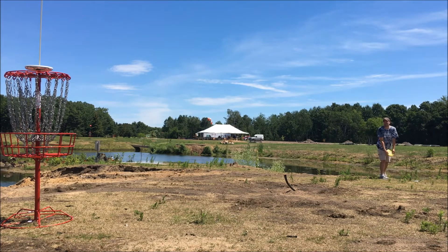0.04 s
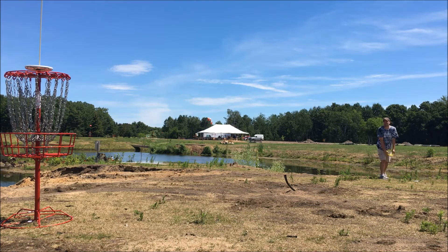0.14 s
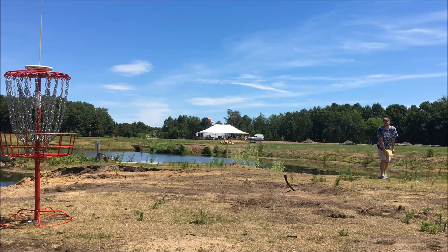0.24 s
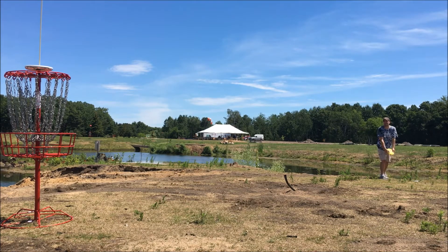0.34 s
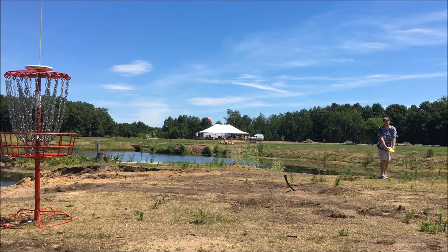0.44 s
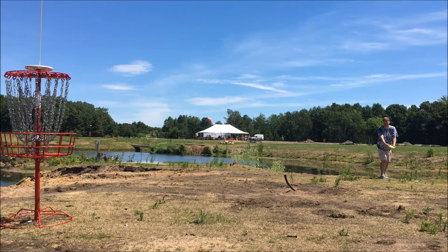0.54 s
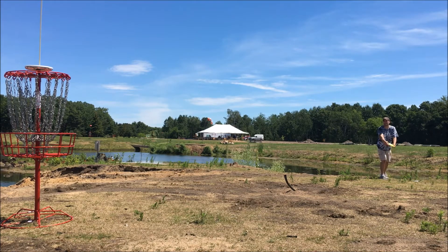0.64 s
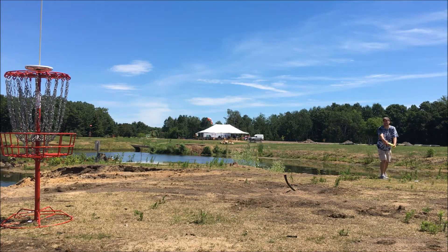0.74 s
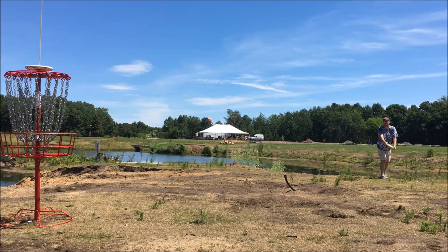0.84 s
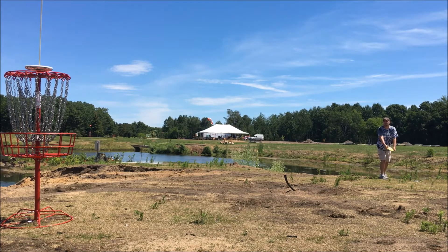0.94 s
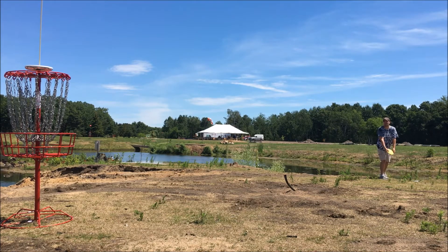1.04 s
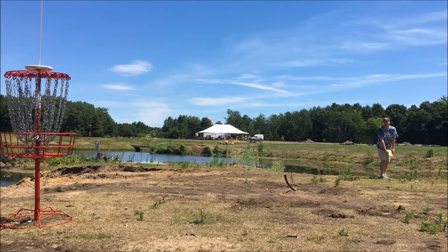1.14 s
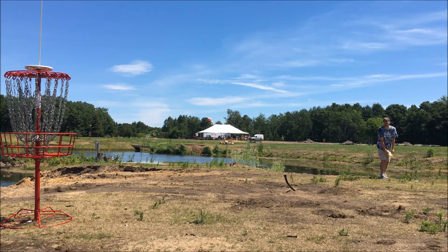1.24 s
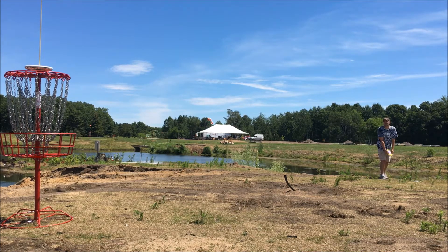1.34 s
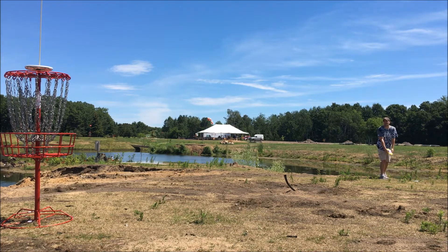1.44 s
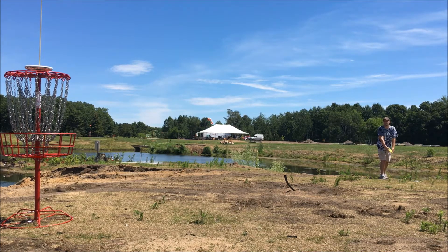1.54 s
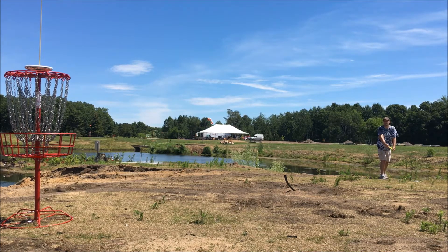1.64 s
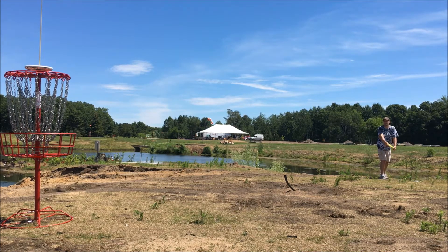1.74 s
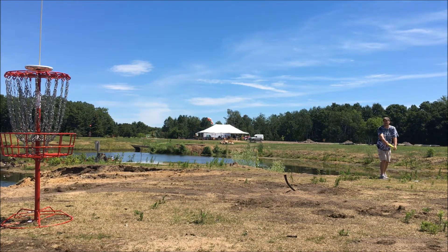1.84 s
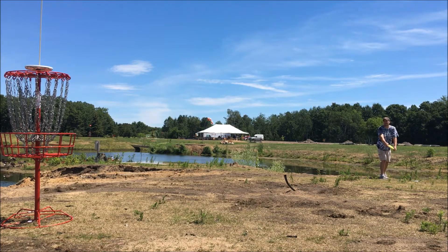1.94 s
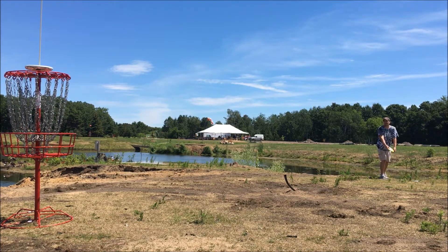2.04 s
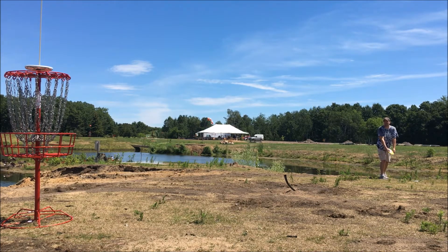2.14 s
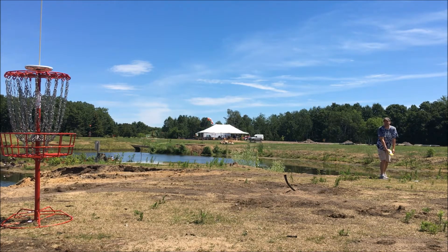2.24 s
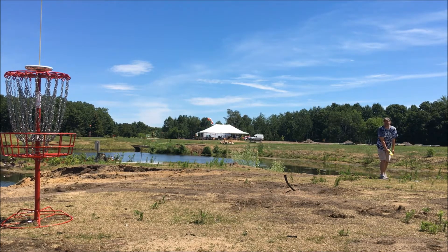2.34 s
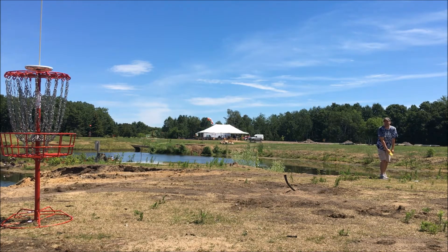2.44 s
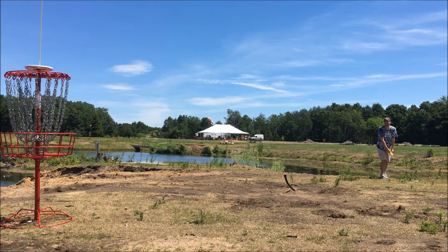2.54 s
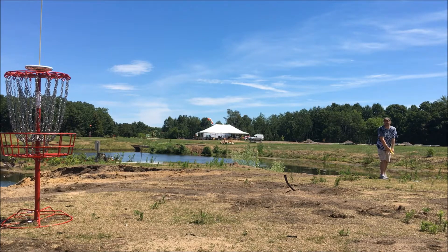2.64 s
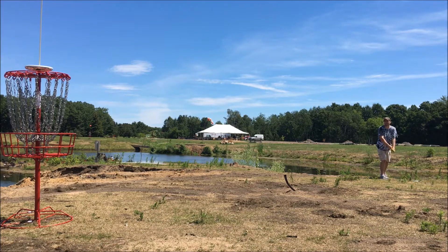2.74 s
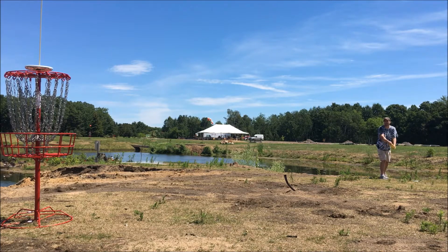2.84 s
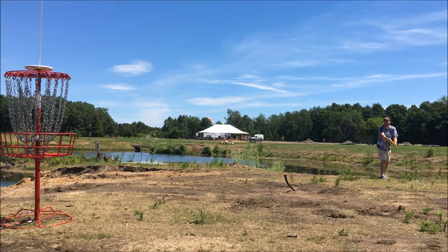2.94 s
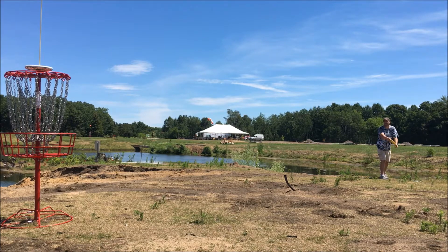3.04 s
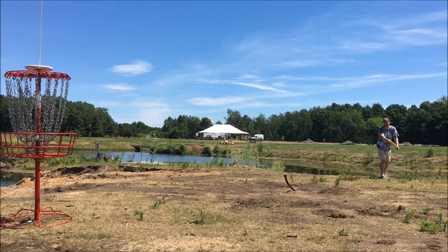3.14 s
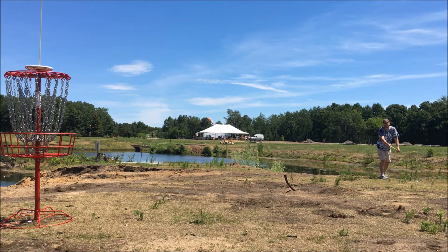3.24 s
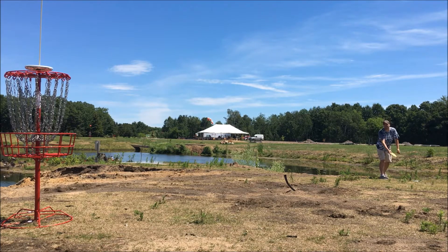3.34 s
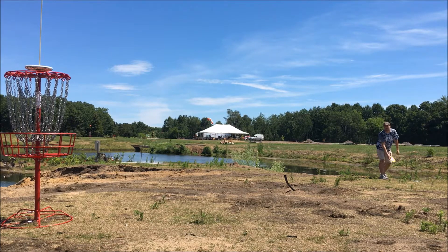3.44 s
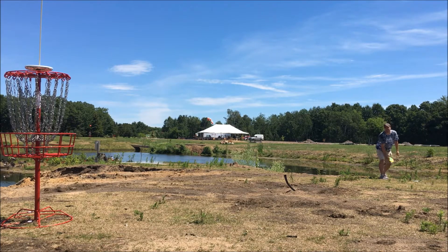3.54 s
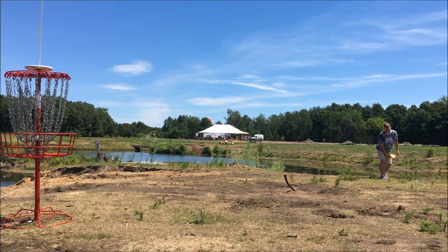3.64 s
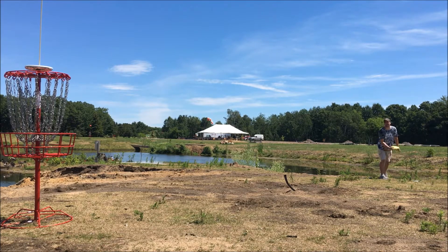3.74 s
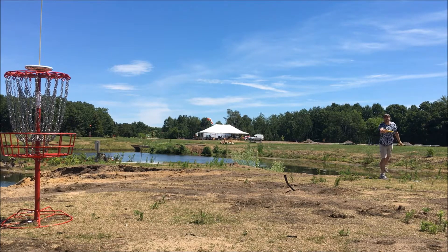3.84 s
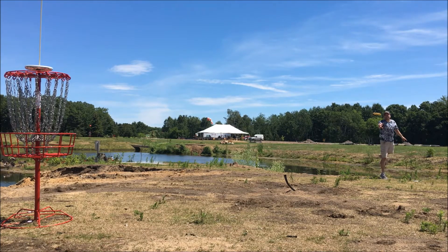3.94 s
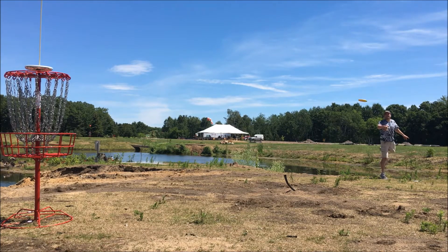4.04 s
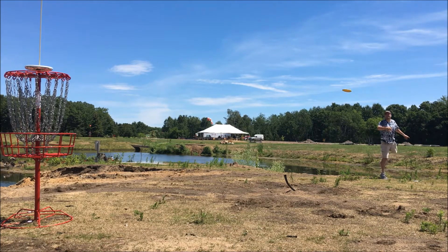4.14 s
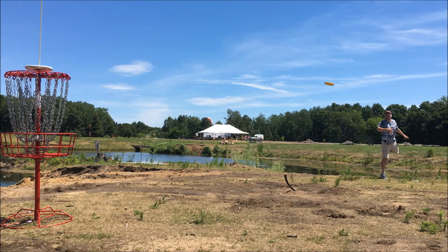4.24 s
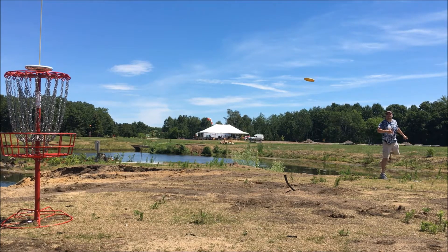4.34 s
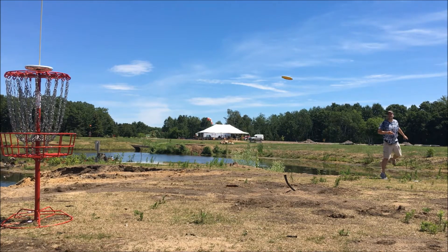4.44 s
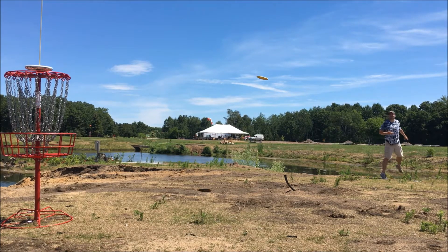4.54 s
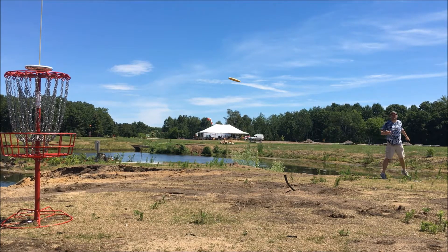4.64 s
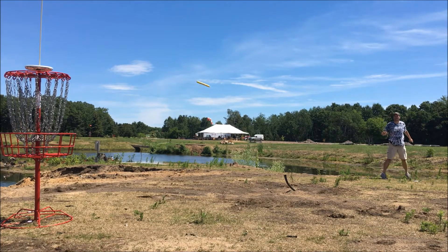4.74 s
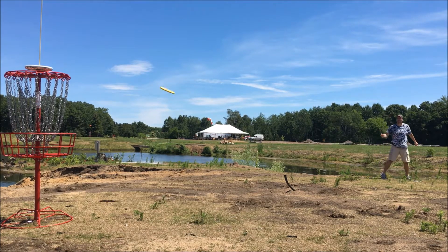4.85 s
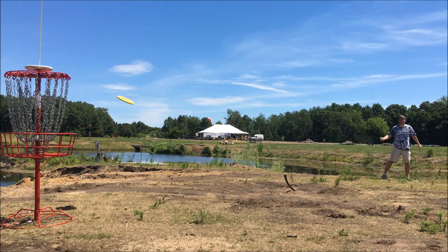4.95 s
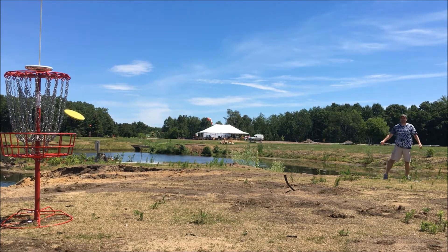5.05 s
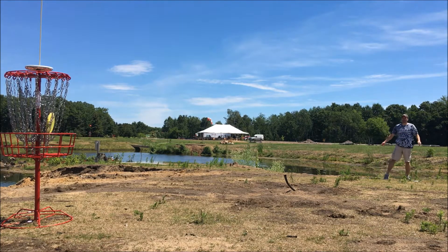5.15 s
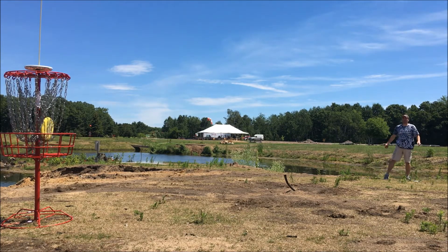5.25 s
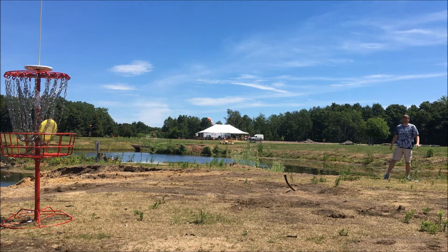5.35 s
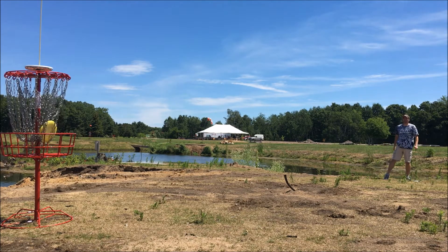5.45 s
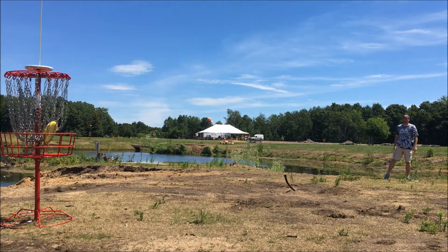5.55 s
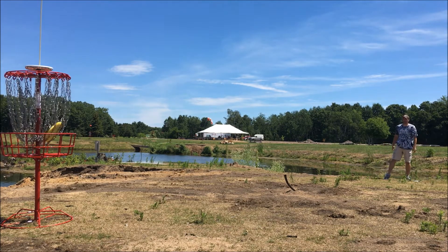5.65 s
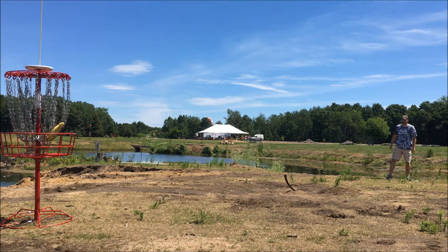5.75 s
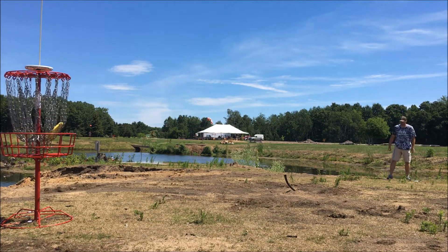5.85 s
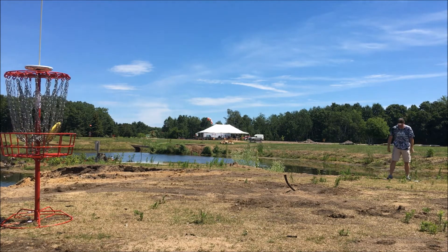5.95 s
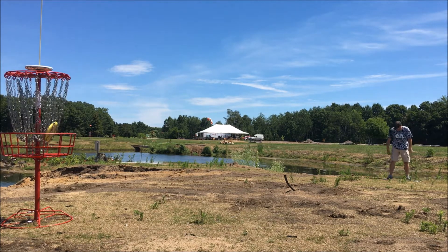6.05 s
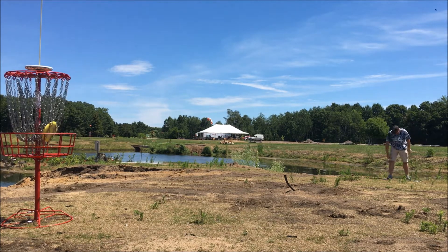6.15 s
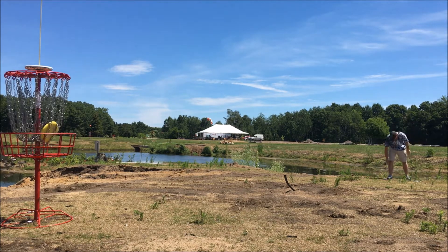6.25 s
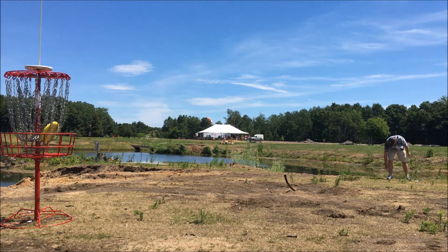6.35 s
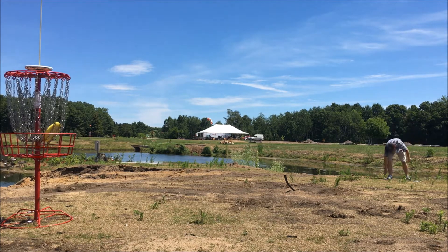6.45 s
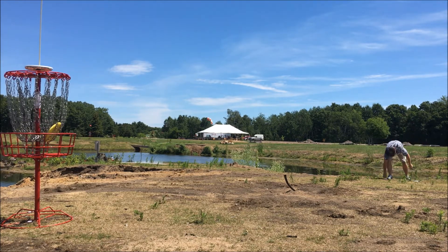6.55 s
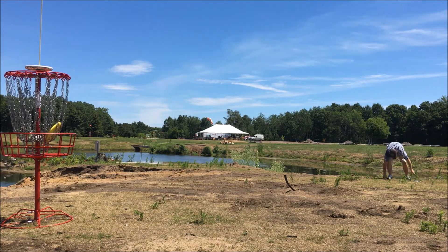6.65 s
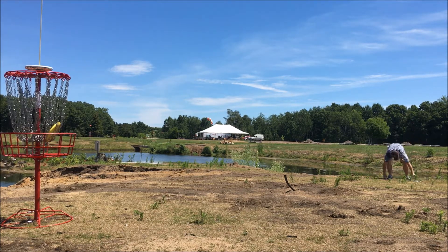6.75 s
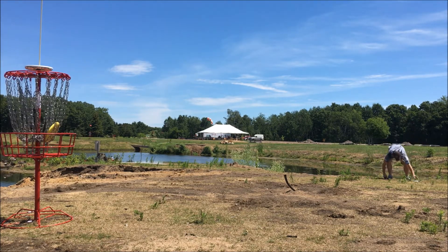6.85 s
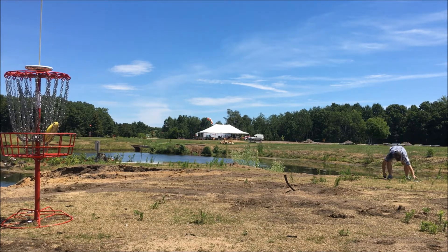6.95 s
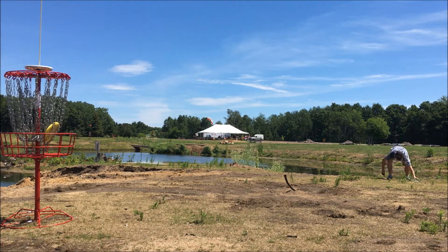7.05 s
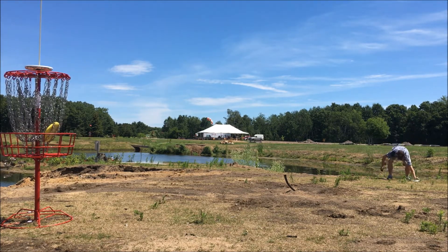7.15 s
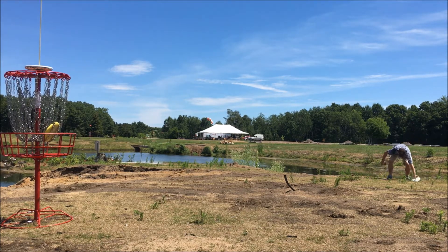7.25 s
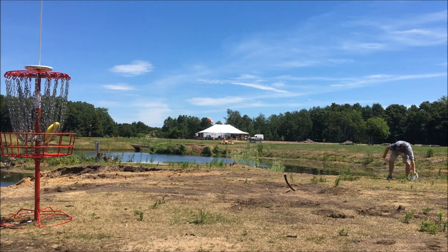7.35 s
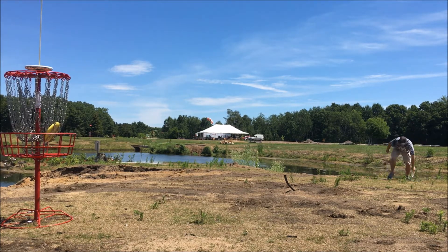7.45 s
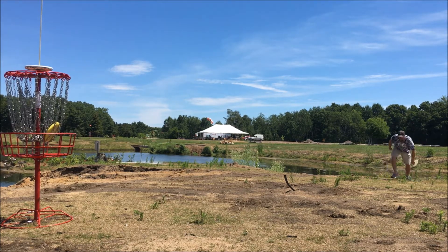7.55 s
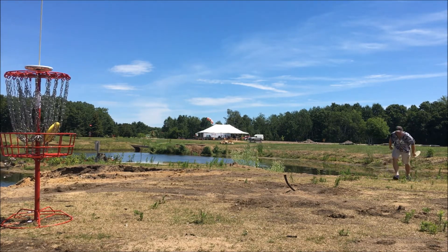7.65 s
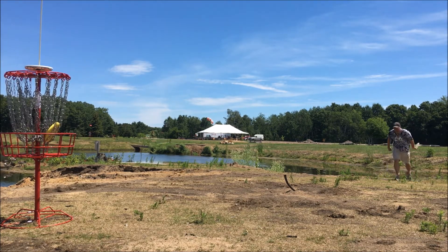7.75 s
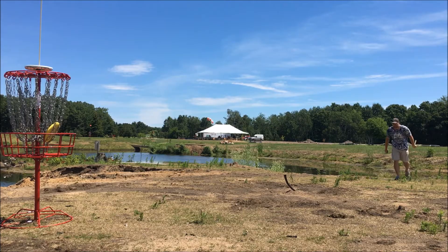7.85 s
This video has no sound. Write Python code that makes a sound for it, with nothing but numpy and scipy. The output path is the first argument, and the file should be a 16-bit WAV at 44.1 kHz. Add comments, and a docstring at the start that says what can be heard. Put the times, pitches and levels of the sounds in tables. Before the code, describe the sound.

An open field with soft wind rumble, faint hiss and two distant engines droning low. A quick high bird trill comes first, then thin whistles and hoarse chucks. Just after five seconds a plastic disc smashes into steel chains close to the microphone: dull knocks, a ringing pole and bright jingling. The links rattle, clink and settle into sparse tiny tinkles while the engine hum continues.

```python
"""Open field: a thrown disc crashes into the chains of a steel basket; the links jingle and settle.
Basket: struck decaying modes for clinks, pole and plastic, over random link collisions and noise grit.
Two far engines, one slowing, one pulling away: wavering sine orders of the firing cycle.
Birds: swept-sine trill, whistles of summed partials, chucks and chips of band noise.
Light wind and distant traffic: coloured noise, with one puff as a short low sine."""
import sys
import numpy as np
from scipy import signal
from scipy.io import wavfile
from scipy.ndimage import uniform_filter1d

SR = 44100
rng = np.random.default_rng(int(sys.argv[2]) if len(sys.argv) > 2 else 0)


def file_out(sig):
    """Save sig as 16-bit WAV at sys.argv[1]."""
    # one column per channel
    cols = np.atleast_2d(sig).T
    # limit, then scale
    lim = np.clip(cols, -1, 1)
    pcm = np.round(lim * 32767).astype(np.int16)
    wavfile.write(sys.argv[1], SR, pcm)


N = 348373
T = np.arange(N) / SR
IMPACT_S = 5.168

# how hard the chains swing between the clear clinks: t/s, swing/dB
SWING = [(5.168, -34), (5.19, -22.5), (5.36, -28), (5.51, -40), (5.64, -34), (5.93, -48.5), (6.06, -49.5),
         (6.31, -55.5), (6.47, -64), (6.89, -68.5), (7.25, -80), (7.61, -73), (7.9, -77)]
# plastic disc modes: f/Hz, relative level/dB, t60/s
DISC_MODES = [(436, -14.5, 0.013), (614, -9.5, .02), (796, -7, 0.032), (996, -1.5, 0.038),
              (1360, -2.5, 0.015)]
# disc rim modes: f/Hz, relative level/dB, t60/s
RIM_MODES = [(1620, 1, .014), (2200, 1, 0.01), (2740, -5, 0.006), (3610, 3.5, 0.01), (4220, -3.5, 0.014)]


def gain_of(db):
    """Decibels to gain."""
    return 10 ** (np.asarray(db) / 20)


def evened(x):
    """Scales to rms 1."""
    return x / np.sqrt(np.mean(x ** 2) + 1e-20)


def follow(rows, t=T):
    """Joins table rows by straight lines in time, one curve per column."""
    times_s, *columns = np.transpose(rows)
    return [np.interp(t, times_s, column) for column in columns]


def add(mix, start_s, sound):
    """Mixes a sound in at a time."""
    part = mix[round(start_s * SR):][:len(sound)]
    part += sound[:len(part)]


def noise(shape, size, patchy_db):
    """Rms-1 noise from random short-time spectra of a given colour, with drifting patches."""
    frames = 4 * N // size + 5
    bin_hz = np.fft.rfftfreq(size, 1 / SR)
    real, imag, patches = rng.standard_normal((frames, len(bin_hz), 3)).T
    patches = uniform_filter1d(patches, size=12, axis=0)  # along frequency
    patches = evened(uniform_filter1d(patches, size=10, axis=1))  # along time
    shape_hz, shape_db = np.transpose(shape)
    colour_db = np.interp(np.log(bin_hz + 1), np.log(shape_hz + 1), shape_db)[:, None]
    spectra = (real + 1j * imag) * gain_of(colour_db + patchy_db * patches)
    _, x = signal.istft(spectra, nperseg=size, noverlap=3 * size // 4)
    return evened(x[:N])


def ring(modes, detune, uneven_db, tick_db, rise=.001, seconds=.15):
    """One blow: dying modes (peak 1), a little different each time, plus a short noise crack."""
    t = np.arange(round(seconds * SR)) / SR
    hz, db, t60_s = np.transpose(modes)[:, :, None]
    shift, spread, phase = rng.standard_normal((3, len(modes), 1))
    decay = gain_of(db + uneven_db * spread - 60 * t / t60_s)
    tones = (decay * np.sin(2 * np.pi * hz * (1 + detune * shift) * t + phase)).sum(0)
    tones = tones * np.minimum(t / rise, 1)
    band = signal.butter(2, [3500, 12500], "bandpass", fs=SR, output="sos")
    crack = signal.sosfilt(band, rng.standard_normal(len(t))) * gain_of(tick_db - 60 * t / .015)
    return tones / abs(tones).max() + crack


def air():
    """Lumpy wind rumble, a distant roar with a hiss that breathes along, and one puff."""
    # wind and distant traffic: t/s, rumble before an 11 dB lift/dB, roar/dB
    air_levels = [(0, -55.5, -55.5), (.28, -58.5, -53.5), (.88, -58, -57), (1.25, -62.5, -62),
                  (2.45, -61.5, -60), (2.72, -58, -58), (3.15, -58, -59.5), (4.07, -55.5, -58.5),
                  (5.13, -52, -58.5), (5.3, -55, -58.5), (5.96, -57.5, -56.5), (6.34, -52, -56),
                  (6.85, -57, -54), (7.19, -53.5, -57), (7.41, -58.5, -58.5), (7.9, -60, -59)]
    # noise colours: f/Hz, relative density/dB per Hz
    rumble_colour = [(20, -17), (35, -8.5), (55, -2), (90, -0.5), (130, -4), (170, -13.5), (230, -45.5),
                     (320, -110)]
    roar_colour = [(110, -42), (170, -1), (240, -0.5), (350, -5), (480, -16), (700, -35.5), (1000, -63)]
    hiss_colour = [(260, -35), (450, -4), (555, -3), (964, -4.5), (1320, -7), (2470, -10.5), (2910, -15.5),
                   (3490, -14), (10400, -31), (14800, -32.5), (16000, -36.5)]
    # puff of wind on the microphone: t/s, peak level/dB, f/Hz, Gaussian width/s
    gust = (2.93, -33, 62, .045)

    rumble_db, roar_db = follow(air_levels)
    puff_s, puff_db, puff_hz, width_s = gust
    puff = gain_of(puff_db) * np.exp(-((T - puff_s) / width_s) ** 2) * np.sin(2 * np.pi * puff_hz * T)
    hiss_db = -63 + .35 * (roar_db - roar_db.mean())
    hiss = gain_of(hiss_db) * noise(hiss_colour, size=1024, patchy_db=1.5)
    roar = gain_of(roar_db) * noise(roar_colour, size=2048, patchy_db=0.9)
    rumble = gain_of(rumble_db + 11) * noise(rumble_colour, size=2048, patchy_db=2.5)
    return rumble + roar + hiss + puff


def engine(rows):
    """Low orders of the firing cycle, each wavering as it crosses the field."""
    # order/multiple of cycle rate, level re mean of 2nd and 4th order/dB
    upper_orders = [(5, -21), (6, -26), (7, -30.5), (8, -25.5), (9, -40.5), (10, -42)]
    waver_db, steady_db, waver_per_db = 1.08, -40, 0.2443  # orders fainter than steady_db waver more
    fade_s = 0.12

    cycle_hz, fourth_db, second_db, third_db = follow(rows)
    turns = 2 * np.pi * np.cumsum(cycle_hz) / SR
    orders = [(4, fourth_db), (2, second_db), (3, third_db)]
    orders += [(k, (fourth_db + second_db) / 2 + relative_db) for k, relative_db in upper_orders]
    slow = signal.butter(2, 6, fs=SR, output="sos")
    out = 0
    for k, db in orders:
        level_waver, phase_waver = evened(signal.sosfilt(slow, rng.standard_normal((2, N))))
        depth_db = waver_db + waver_per_db * np.clip(steady_db - db, 0, 10)
        out = out + gain_of(db + depth_db * level_waver) * np.sin(k * turns + .05 * k * phase_waver)
    inside_s = np.minimum(T - rows[0][0], rows[-1][0] - T)
    heard = np.clip(inside_s / fade_s + 1, 0, 1)
    return np.sqrt(2) * out * heard


def trill():
    """Quick run of up-down sine sweeps, each slightly off in pitch."""
    # loudness of the run: t/s, level added to the sweep's/dB
    loudness = [(.05, -57.5), (.35, -55.5), (.65, -58.5), (1.12, -64), (1.35, -57.5), (1.42, -59)]
    # one note: t/s, nominal f/Hz, relative level/dB
    sweep = [(-.024, 6440, -14), (-.016, 7200, -16), (-.011, 7550, -30), (-.006, 6600, -16), (0, 5550, -1),
             (.005, 5150, -3), (0.012, 4520, -8.5), (.015, 3900, -23)]
    start_s, gap_s, notes = .0528, .0681, 21

    out = np.zeros(N)
    t = np.arange(sweep[0][0], sweep[-1][0], 1 / SR)
    hz, shape_db = follow(sweep, t)
    starts_s = start_s + gap_s * np.arange(notes)
    for note_s, db in zip(starts_s, follow(loudness, starts_s)[0]):
        turns = 2 * np.pi * np.cumsum(hz * rng.normal(1, 0.0117)) / SR
        note = np.sin(turns) * gain_of(db + shape_db)
        add(out, note_s + t[0], note * signal.windows.tukey(len(t), .15))
    return out


def whistles():
    """Nasal whistles: partials of an absent base pitch that holds, then droops."""
    # start/s, length/s, first base f/Hz, last base f/Hz, level of each partial in turn/dB
    calls = [(2.253, 0.17, 1810, 1750, -70, -100, -83, -86), (2.382, 0.13, 1750, 1660, -77, -75, -75, -85),
             (2.734, 0.17, 1791, 1730, -72, -90, -95, -96), (2.876, 0.0945, 1730, 1690, -77, -83, -85, -87),
             (5.747, 0.184, 1860, 1820, -64.5, -90, -80, -82),
             (6.216, 0.12, 1830, 1784, -64, -95, -87, -91)]
    # partials: multiple of base f
    partials = (2, 2.5, 3, 4)

    out = np.zeros(N)
    for start_s, length_s, first_hz, last_hz, *partials_db in calls:
        u = np.linspace(0, 1, round(length_s * SR))
        pitch_waver, level_waver = evened(uniform_filter1d(rng.standard_normal((2, len(u))), size=500))
        hz = first_hz + (last_hz - first_hz) * u ** 1.8 + 8 * pitch_waver
        turns = 2 * np.pi * np.cumsum(hz) / SR
        tone = sum(gain_of(db) * np.sin(k * turns) for k, db in zip(partials, partials_db))
        tone = np.sqrt(2) * gain_of(2.03 * level_waver) * tone
        add(out, start_s, tone * signal.windows.tukey(len(u), .35))
    return out


def chucks():
    """Hoarse chucks and thin high chips: short bursts of band noise."""
    # both: start/s, length/s, level/dB, f/Hz (band from 300 below to 450 above)
    hoarse = [(0.26, 0.038, -62.5, 1890), (2.36, 0.034, -62, 1864), (3.742, 0.036, -60, 1822),
              (5.947, 0.04, -57.5, 1740), (6.483, 0.039, -59, 1850), (6.942, 0.056, -58, 1817),
              (7.44, 0.031, -62, 1870)]
    chips = [(3.744, 0.0091, -74, 7750), (3.813, 0.0058, -67, 8600)]

    out = np.zeros(N)
    for start_s, length_s, db, hz in hoarse + chips:
        band = signal.butter(2, [hz - 300, hz + 450], "bandpass", fs=SR, output="sos")
        rasp = evened(signal.sosfilt(band, rng.standard_normal(round(length_s * SR))))
        add(out, start_s, gain_of(db) * rasp * signal.windows.tukey(len(rasp), .6))
    return out


def field(x):
    """A bounce off the ground and a thin scatter from grass and trees."""
    t = np.arange(round(.3 * SR)) / SR
    scatter = rng.standard_normal(len(t)) * gain_of(-60 * t / .12) * (t > .004)
    response = gain_of(-9) * scatter / np.linalg.norm(scatter)
    response[0], response[150] = 1, .3  # direct sound, ground bounce 3.4 ms later
    return signal.fftconvolve(x, response)[:N]


def disc():
    """Dull plastic knocks of disc modes; edge-on blows excite the rim modes more and are brighter."""
    # disc against chain and tray: t/s, level/dB, rim level re disc/dB
    knocks = [(5.17, -26, 5), (5.174, -27, 6), (5.203, -34, 9.5), (5.212, -28, -5), (5.221, -30, 1),
              (5.278, -42, 13), (5.308, -34, 0), (5.317, -35.5, -8), (5.506, -42.5, 5), (5.57, -40.5, 0),
              (5.672, -42, -12), (5.725, -41, -3), (5.813, -40, -4), (5.905, -40, -8), (6.41, -51, -12),
              (7.184, -45.5, -21)]

    out = np.zeros(N)
    for hit_s, db, bright_db in knocks:
        body = ring(DISC_MODES, detune=.04, uneven_db=2, tick_db=-36, rise=.002, seconds=.06)
        add(out, hit_s, gain_of(db) * body)
        edge = ring(RIM_MODES, detune=.08, uneven_db=3, tick_db=-20, seconds=.06)
        add(out, hit_s, gain_of(db + bright_db) * edge)
    return out


def pole():
    """Chains whip against the steel pole; each blow adds energy to its modes near 5 kHz."""
    # blows: t/s, level/dB
    blows = [(5.238, -39), (5.2564, -22), (5.275, -15.5), (5.283, -7.5), (5.3294, -34), (5.3792, -28),
             (5.4145, -30.5), (5.4954, -38.5), (5.5479, -57), (5.7266, -40), (5.7944, -48), (6.0487, -56),
             (6.35, -61), (7.2497, -50)]
    # pole modes: f/Hz, relative level/dB, t60/s
    pole_modes = [(5084, 0, .11), (5076, -29, 1.4), (5136, -12, .12), (5240, -17, .08), (5285, -17, .08)]

    out, t = np.zeros(N), np.arange(SR) / SR
    rise = np.minimum(t / 0.0043, 1)
    for hz, mode_db, t60_s in pole_modes:
        energy = np.zeros(N)
        for hit_s, db in blows:
            add(energy, hit_s, (gain_of(db + mode_db - 60 * t / t60_s) * rise) ** 2)
        damping = evened(uniform_filter1d(rng.standard_normal(N), size=700))  # links brush the pole
        tone = np.sin(2 * np.pi * (hz * T + rng.random()))
        out += gain_of(2.1 * damping) * np.sqrt(energy) * tone
    return out


def stirred(rest_db, share, lurch_db):
    """Level of one chain layer: rest_db at -40 dB swing, a share of the swing's change, plus lurches."""
    # the bundle of chains lurches and grinds: t/s, level before lurch_db/dB
    lurches = [(5.17, -30), (5.273, -30), (5.376, -38), (5.728, -45), (5.796, -59), (5.942, -67),
               (7.2, -63.5)]
    rise_s, t60_s = .006, 0.27

    power = gain_of(rest_db + share * (follow(SWING)[0] + 40)) ** 2
    for lurch_s, db in lurches:
        t = np.maximum(T - lurch_s, 0)
        lurch = gain_of(db + lurch_db - 60 * t / t60_s) * np.minimum(t / rise_s, 1)
        power = power + lurch ** 2
    return 10 * np.log10(power)


def scraping(level_db):
    """Links sliding over links: grit that flickers in bursts of a few milliseconds."""
    # grit colour: f/Hz, relative density/dB per Hz
    grit_colour = [(1500, -29.5), (3000, -17), (4600, -12), (5400, -2), (8500, -2), (10500, -8.5),
                   (12500, -3), (14000, -18), (16000, -26.5)]
    bursts_per_s, decay_s = 500, .004

    bursts = gain_of(1.4 * rng.exponential(1, N)) * (rng.random(N) < bursts_per_s / SR)
    decay = np.exp(-1 / (decay_s * SR))
    flicker = evened(.002 + signal.lfilter([1], [1, -decay], bursts / SR ** .5))
    return gain_of(level_db) * (T > IMPACT_S) * flicker * noise(grit_colour, size=256, patchy_db=2.5)


def rattle(modes, level_db, per_s, spread_db, tick_db, detune):
    """Random small collisions among many slightly different links."""
    links = 24
    start = round(IMPACT_S * SR)
    length = N - start
    size = gain_of(spread_db * np.minimum(rng.exponential(1, length), 4))
    size = size * (rng.random(length) < per_s / SR)
    link = rng.integers(0, links, length)
    size = size / np.sqrt(np.mean(size ** 2) * links)
    out = np.zeros(N)
    for k in range(links):
        body = ring(modes, detune=detune, uneven_db=3, tick_db=tick_db)
        blows = size * (link == k) * gain_of(level_db[start:])
        out[start:] += signal.oaconvolve(blows, body / np.linalg.norm(body))[:length]
    return out * np.sqrt(links)


def chains():
    """Clear clinks and pings over a dense jingle, grit, and the disc clattering among the links."""
    # link on link, ringing high: t/s, level/dB
    clinks = [(5.1725, -15.5), (5.1843, -13.5), (5.2142, -17.5), (5.2339, -12.5), (5.3262, -18),
              (5.381, -30), (5.4664, -39), (5.575, -27), (5.6172, -31.5), (5.653, -27.5), (5.682, -24.5),
              (5.729, -25.5), (5.7952, -21.5), (5.9255, -39), (5.9436, -31.5), (5.974, -30),
              (6.0491, -33.5), (6.0894, -34.5), (6.1271, -36), (6.183, -40.5), (6.234, -35), (6.2563, -51),
              (6.2871, -35), (6.3303, -44), (6.405, -30.5), (6.4677, -41), (6.6872, -53), (6.706, -41),
              (6.725, -40.5), (6.824, -45), (6.8839, -50), (6.9013, -46), (6.9406, -50.5), (6.9693, -50),
              (7.1196, -52), (7.1536, -54), (7.1982, -53), (7.2166, -42), (7.254, -51), (7.4442, -49),
              (7.4842, -56), (7.5957, -47.5), (7.6553, -53.5), (7.7547, -52.5), (7.7834, -48)]
    # link on the tray wires, ringing lower: t/s, level/dB
    pings = [(5.2983, -34), (5.3677, -30), (5.4554, -30.5), (5.4914, -30), (5.546, -35), (5.5697, -32.5),
             (5.652, -32), (5.7044, -34), (5.7275, -25), (5.8441, -38), (5.972, -44), (6.0631, -41),
             (6.1235, -38.5), (6.194, -44), (6.2233, -50), (6.2997, -43.5), (6.345, -44.5), (6.3782, -44.5),
             (6.4101, -47), (6.4782, -48), (6.6049, -50), (6.7236, -51.5), (7.1192, -54), (7.1968, -47),
             (7.2154, -49.5), (7.2514, -46), (7.296, -55), (7.6687, -54.5), (7.7187, -55.5)]
    # link modes, high and low: f/Hz, relative level/dB, t60/s
    high_modes = [(11280, -10.5, 0.044), (11630, -14, 0.15), (11660, -3, 0.093), (11820, 2, 0.076),
                  (12030, -25.5, .06), (12320, -9, 0.09), (12100, -13.5, .06), (12200, -13, .05),
                  (12700, -20.5, .04), (13340, -12, .06), (13800, -26, 0.05043), (14420, -24.5, 0.05085),
                  (15300, -29.5, 0.045)]
    low_modes = [(3707, -19, 0.08), (3835, -19, .06), (5476, -2.5, 0.024), (6420, -13, .03),
                 (7570, -6, .045), (8160, -7.5, 0.026), (8910, -9.5, 0.048), (9890, -5.5, 0.062)]

    high_db = follow(SWING)[0] - 3.5
    low_db = stirred(rest_db=-57.5, share=0.9, lurch_db=-4)
    clatter_db = stirred(rest_db=-63.5, share=0.87, lurch_db=-9)
    grit_db = stirred(rest_db=-57, share=0.84, lurch_db=2.4)
    out = rattle(high_modes, high_db, per_s=300, spread_db=3.5, tick_db=-16.0, detune=.004)
    out += rattle(low_modes, low_db, per_s=310, spread_db=3.0, tick_db=-11.5, detune=0.0051)
    plastic_modes = DISC_MODES[3:] + RIM_MODES
    out += rattle(plastic_modes, clatter_db, per_s=500, spread_db=3, tick_db=-14, detune=.2)
    for hit_s, db in clinks:
        clink = ring(high_modes, detune=0.002024, uneven_db=4, tick_db=-14, rise=0.0018)
        add(out, hit_s, gain_of(db) * clink)
    for hit_s, db in pings:
        ping = ring(low_modes, detune=0.0071, uneven_db=3.5, tick_db=-11, rise=.0015)
        add(out, hit_s, gain_of(db) * ping)
    return out + scraping(grit_db)


def scene():
    """Basket in the field, over birds, engines and wind."""
    # engines: t/s, cycle rate f/Hz, 4th order/dB, 2nd order/dB, 3rd order/dB
    slowing = [(0, 39.7, -50, -39, -53.5), (.25, 40.34, -42.5, -45.5, -42.5),
               (.6, 40.65, -46.5, -44.5, -48.5), (.72, 40.56, -56.5, -47.5, -50),
               (.9, 37.33, -48, -67, -52), (1.08, 33.1, -55, -55, -53), (1.3, 32.5, -50.5, -57, -58),
               (2.1, 32.6, -50, -56, -70), (2.3, 32.4, -66, -69, -64)]
    pulling_away = [(.6, 29.94, -58, -63, -62), (1.2, 29.63, -47, -51, -57), (1.4, 28.96, -55, -55, -55),
                    (1.55, 27.55, -48.5, -55, -68), (2.31, 27.42, -45.5, -50, -49.5),
                    (2.82, 27.6, -48.5, -57, -54), (3.26, 28.95, -42, -47.5, -51),
                    (3.65, 29.75, -42, -50, -49), (3.76, 29.9, -33.5, -41, -57),
                    (3.85, 30.22, -42, -50, -53), (4.02, 30.33, -32.5, -50, -42),
                    (4.09, 30.63, -41.5, -57, -57), (4.18, 30.95, -35, -47.5, -47.5),
                    (5.49, 33.53, -37.5, -42.5, -50.5), (5.63, 33.78, -36, -39, -44),
                    (6.02, 34.77, -35.5, -41, -44.5), (7.05, 36.11, -43, -37, -48),
                    (7.4, 36.27, -41, -37, -44.5), (7.62, 36.07, -45, -50, -51),
                    (7.9, 32.8, -46, -56.5, -49.5)]

    basket = field(chains() + pole() + disc())
    birds = trill() + whistles() + chucks()
    engines = engine(slowing) + engine(pulling_away)
    return (basket + birds + engines + air())[None]


def record(dry):
    """Band limit: linear-phase low-pass at 15.8 kHz."""
    lowpass = signal.firwin(511, 15800, window=("kaiser", 9), fs=SR)
    return signal.oaconvolve(dry, lowpass[None], "same")


dry = scene()
out = record(dry)
file_out(out)
```